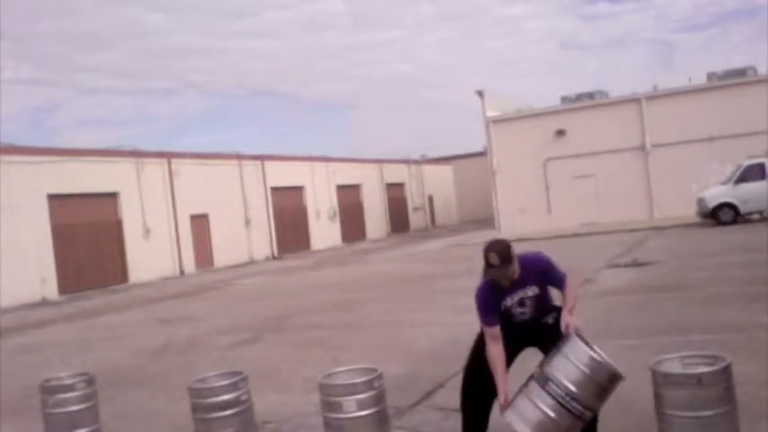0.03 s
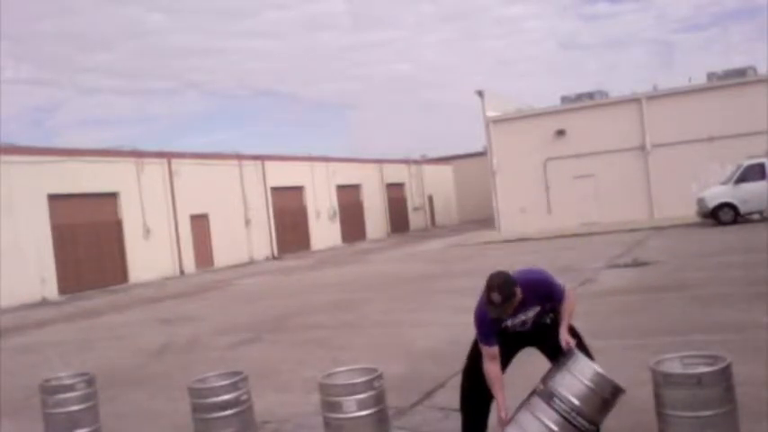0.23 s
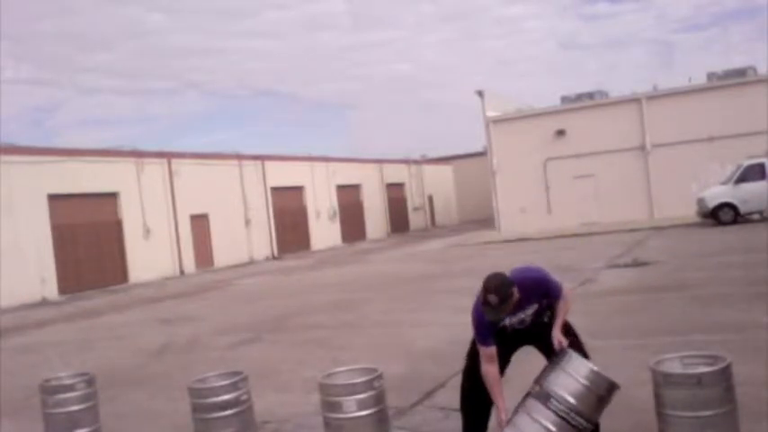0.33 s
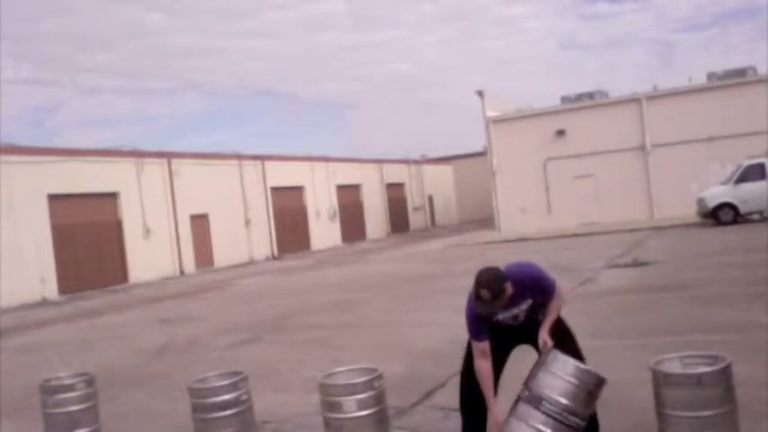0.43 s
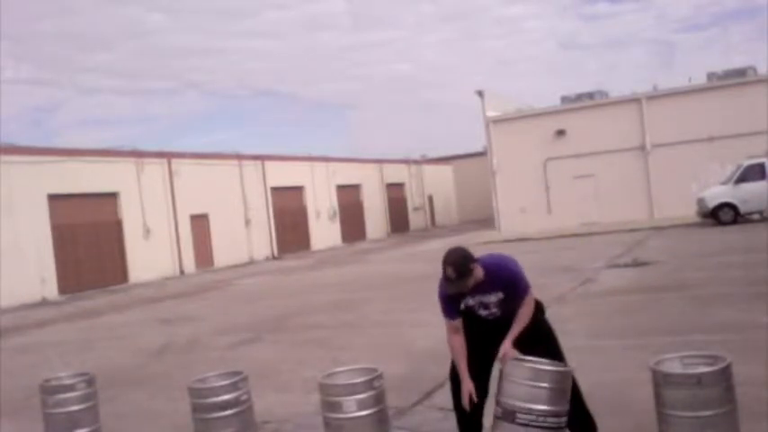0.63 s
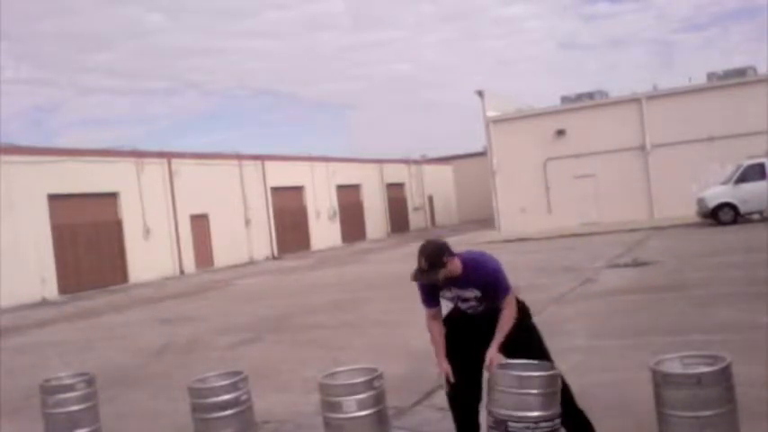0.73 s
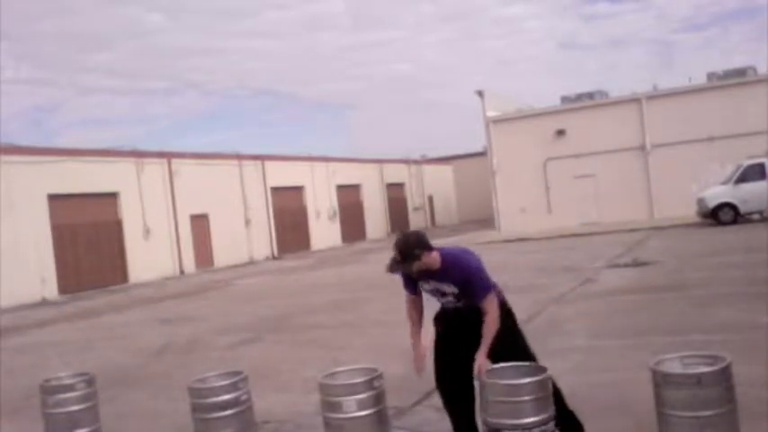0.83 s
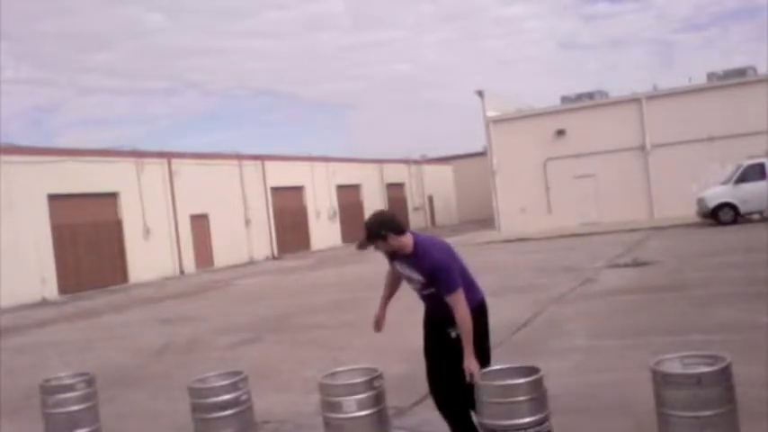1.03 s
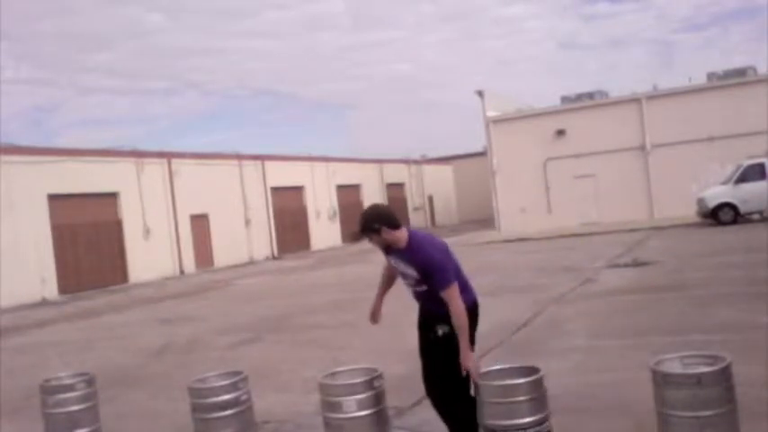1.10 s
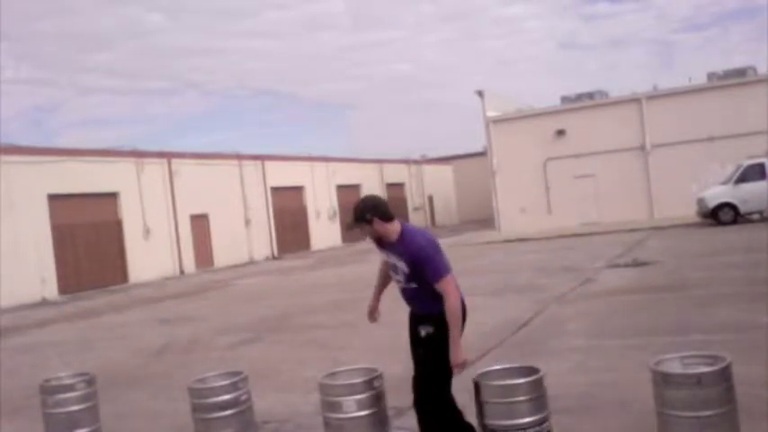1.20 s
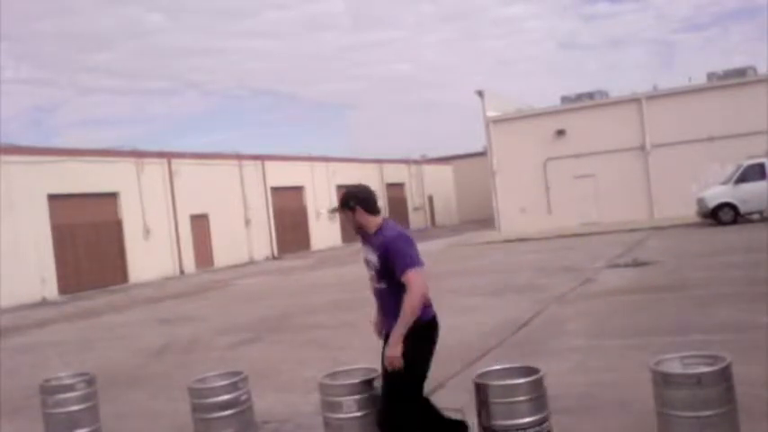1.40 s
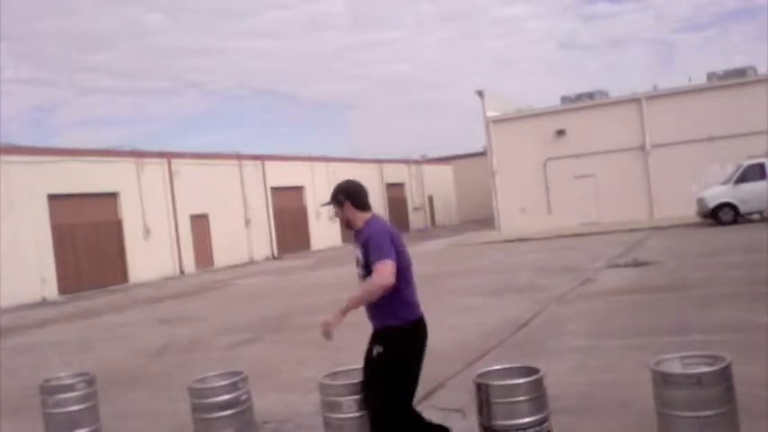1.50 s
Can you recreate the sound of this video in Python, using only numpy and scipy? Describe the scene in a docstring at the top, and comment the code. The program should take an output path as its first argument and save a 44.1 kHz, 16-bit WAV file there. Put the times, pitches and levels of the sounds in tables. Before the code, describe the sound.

A metal keg knocks down on concrete, then clatters and rocks to rest outdoors.

```python
"""A steel beer keg is swung down onto concrete in a yard between low buildings. Its rim lands with one
hard knock that slaps back off the walls, grit crunches as it is tipped upright, then the base clatters down
and rocks to rest. Each impact excites the damped modes of the shell, with a thump from its weight and a
crack at the contact. Faint reverberation and a soft hiss linger over distant traffic and wind."""
import sys
import numpy as np
from scipy import signal
from scipy.fft import rfft, irfft
from scipy.io import wavfile
from scipy.ndimage import uniform_filter1d

SR = 44100
rng = np.random.default_rng(int(sys.argv[2]) if len(sys.argv) > 2 else 0)


def dump_mix(stems):
    """Bounce the given channels to the path in sys.argv[1] as a 16-bit WAV at rate SR."""
    frames = np.atleast_2d(stems).T  # one column per channel
    limited = np.clip(frames, -1, 1)  # hard clip at full scale
    pcm = np.round(limited * 32767).astype(np.int16)
    wavfile.write(sys.argv[1], SR, pcm)


N = 68355
T = np.arange(N) / SR

# Knocks of the keg on the ground, and the first knock's slap echoes off the walls (0.30 to 0.44 s).
# Each row: start in seconds, relative levels in dB of the low thud, middle clang, high ring and crack,
# stance from 0 (tilted) to 1 (upright).
KNOCKS_AND_ECHOES = [(0.2040, -6.5, -5, -17.5, -23.5, 0.19), (0.2078, -12.5, -13, -6, -11.5, 0.23),
                     (0.2120, -13.5, -11, -20.5, -28.5, 0.3), (0.2285, -10, -28, -21, -29, 0.04),
                     (0.243, -60, -31.5, -18, -28.5, 0.095), (0.3000, -19, -27, -22.5, -34, 0),
                     (0.3309, -24, -22, -24.5, -61, 0.17), (0.3550, -35.5, -33, -27, -50, 0),
                     (0.3820, -54, -41, -27.5, -49, 0), (0.4400, -26.5, -35, -41, -80, 0),
                     (0.4680, -32.5, -51, -34.5, -75, 0.75), (0.888, -35, -39.5, -47, -56, 0.88),
                     (0.9422, -14.5, -13.5, -15.5, -35, 1), (0.9460, -74, -24, -13.5, -40, 0.2),
                     (0.9520, -28, -16.5, -15, -44, 1), (0.978, -18, -11, -15.5, -32, 0.7),
                     (0.9990, -16, -14, -21.5, -35, 0.94), (1.0144, -16.5, -9, -31, -44, 0.41),
                     (1.0460, -19, -6, -18.5, -30.5, 0.95), (1.0538, -6, -19, -69, -39, 0.85),
                     (1.0705, -34, -23, -31.5, -40, 0.47), (1.0950, -28, -16.5, -46, -48, 0),
                     (1.1030, -15.5, -30.5, -31, -48, 0.98), (1.1280, -31, -51, -59, -60, 0.69),
                     (1.1415, -30, -23.5, -57, -55, 0.96), (1.185, -35, -58, -47, -54, 0.65),
                     (1.2360, -29, -60, -52, -59, 1)]


def amp(db):
    """Amplitude grows tenfold for every 20 dB."""
    return 10 ** (np.asarray(db) / 20)


def envelope(table, column):
    """Exponential growth and decay: straight lines in dB join the times in a table's first column."""
    rows = np.array(table)
    return amp(np.interp(T, rows[:, 0], rows[:, column]))


def at_hz(hz, points, values):
    """Interpolation of a spectrum on a log-frequency axis."""
    return np.interp(np.log(hz), np.log(points), values)


def convolve(x, response):
    """A linear system convolves its input with its impulse response."""
    return signal.fftconvolve(x, response)[:N]


def colour(x, spectrum, size=4096):
    """A minimum-phase filter through (Hz, dB) points, scaled to keep the power of white noise."""
    hz = np.maximum(np.arange(size // 2 + 1) * SR / size, 1)
    gain = unit(amp(at_hz(hz, *np.array(spectrum).T)))
    cepstrum = irfft(np.log(gain))
    cepstrum[1:size // 2] *= 2  # folding the cepstrum makes the filter causal
    cepstrum[size // 2 + 1:] = 0
    return convolve(x, irfft(np.exp(rfft(cepstrum))))


def high_pass(x, hz, order=4):
    """Below the cutoff the level falls 6 dB per octave for each order."""
    return signal.sosfilt(signal.butter(order, hz, "high", fs=SR, output="sos"), x)


def unit(x):
    """Normalisation to an rms of 1."""
    return x / np.sqrt(np.mean(x ** 2))


def noise():
    """White noise has equal mean power at all frequencies."""
    return rng.standard_normal(N)


def add(out, start, sound):
    """Superposition: a sound joins the mix at its start in seconds."""
    i = int(start * SR)
    out[i:i + len(sound)] += sound[:N - i]


def ringing(hz, t60):
    """Free vibration: each mode is a complex oscillation that falls 60 dB in t60 seconds."""
    return np.exp((2j * np.pi * hz - np.log(1000) / t60)[:, None] * T[:SR // 3])


def distant_rumble(smoothing_samples=5000):
    """Far traffic and wind merge into low noise under slow, slight amplitude modulation."""
    # Rumble spectrum. Each row: frequency in Hz, relative density in dB.
    spectrum = [(25, 3.5), (55, -21.5), (100, -5), (180, 2.5), (300, -3), (600, -6.5), (1300, -10),
                (2000, -20.5), (4000, -32.5), (8000, -49), (15000, -138)]
    swell = unit(uniform_filter1d(uniform_filter1d(noise(), smoothing_samples), smoothing_samples))
    return unit(colour(noise(), spectrum)) * amp(-49 + 0.4 * swell)


def keg_ring(count=260, spread_s=0.0015):
    """Modal superposition: knocks and echoes carry the same modes, in a balance set by the stance."""
    # Main modes. Each row: frequency in Hz, 60 dB decay time in seconds, tilted and upright levels in dB.
    modes = [(128.2, 0.19, -18.5, -29.5), (176.6, 0.096, -8, -15.5), (213.7, .11, -6.5, -13),
             (250.7, 0.073, -3, -13.5), (301.6, 0.091, -12, -7.5), (342.3, 0.2, -21, -7),
             (390, 0.093, -14, -6), (476.6, .2, -28, -13), (650.7, 0.089, -20, -14.5),
             (718, 0.18, -24.5, -10.5), (773.7, 0.17, -30, -11.5), (903, 0.17, -13, -18),
             (1117, 0.13, -28.5, -12), (1185, 0.14, -42.5, -11), (1219, 0.12, -43, -12),
             (1752, 0.1, -9, -8.5), (1872, 0.15, -11, -9), (1974, 0.21, -15, -24.5),
             (2084, 0.27, -22.5, -38.5), (2213, 0.16, -22.5, -47), (2410, .17, -20.5, -16),
             (2596, 0.15, -25, -17), (2790, .12, -19.5, -48)]
    # Envelope of the many weaker modes. Each row: frequency in Hz, tilted and upright levels in dB.
    shell = [(402.4, -33, -10), (770, -20.5, -25.5), (1240, -25, -22.5), (1325, -16.5, -27.5),
             (1980, -17, -40.5), (2320, -29, -22.5), (2780, -24.5, -26.5), (3140, -38, -37.5),
             (4568, -43.5, -33)]
    modes, shell = np.array(modes), np.array(shell)
    lowest, highest = shell[[0, -1], 0]
    shell_hz = lowest + (highest - lowest) * (np.arange(count) + rng.random(count)) / count
    shell_t60 = 0.079 * (shell_hz / 1000) ** -0.17  # higher modes die sooner
    hz = np.r_[modes[:, 0], shell_hz]
    rings = ringing(hz, np.r_[modes[:, 1], shell_t60])
    tilted = np.r_[modes[:, 2], at_hz(shell_hz, shell[:, 0], shell[:, 1])]
    upright = np.r_[modes[:, 3], at_hz(shell_hz, shell[:, 0], shell[:, 2])]
    spread = 1 - np.exp(-T[:rings.shape[1]] / spread_s)  # vibration takes time to spread over the shell
    out = np.zeros(N)
    for start, thud, clang, ring, _, stance in KNOCKS_AND_ECHOES:
        strength_db = at_hz(hz, (260, 900, 2200), [thud, clang, ring])
        gains = amp(strength_db + tilted + stance * (upright - tilted))
        phasors = np.exp(2j * np.pi * rng.random(len(hz)))
        add(out, start, spread * ((gains * phasors) @ rings).imag)
    return out


def thumps(rise_s=0.0026, tilted_hz=228.6, upright_hz=319.3):
    """Heavy damping: the keg's weight gives knocks and echoes a brief thump, higher when upright."""
    out, t = np.zeros(N), T[:SR // 10]
    pulse = t / rise_s * np.exp(1 - t / rise_s)
    for start, thud, *_, stance in KNOCKS_AND_ECHOES:
        hz = np.interp(stance, [0, 1], [tilted_hz, upright_hz])
        add(out, start, amp(thud - 1.5) * pulse * np.sin(2 * np.pi * hz * t))
    return out


def cracks(crush_s=0.0031, tail_s=0.062):
    """Brief contact gives a broad spectrum: a snap, crushing and a bright tail, also heard in echoes."""
    # Steel striking concrete. Each row: frequency in Hz, relative density in dB.
    spectrum = [(60, -31.5), (150, -28.5), (500, -14.5), (2000, -0.5), (4000, 2), (6300, -4.5),
                (9000, -8.5), (13000, -16), (16000, -25)]
    out, t = np.zeros(N), T[:8000]
    fade = np.exp(-t / crush_s) + amp(-24.5) * np.exp(-t / tail_s)
    snap = 2.839 * (t == 0)
    for start, *_, crack_db, _ in KNOCKS_AND_ECHOES:
        burst = rng.standard_normal(len(t)) * fade
        add(out, start, amp(crack_db - 4.5) * (burst + snap))
    return colour(out, spectrum)


def yard_reverb(x, build_s=0.0083, t60_s=1.1):
    """Reverberation: scattered reflections from the walls build up, then decay exponentially."""
    # Colour of the reflections. Each row: frequency in Hz, relative gain in dB.
    spectrum = [(80, 6), (170, -2.5), (280, -2.5), (700, -6.5), (1900, 1), (2600, -4), (4500, -12),
                (8000, -11), (15000, -44)]
    build = 1 - np.exp(-(T / build_s) ** 2)
    tail = noise() * build * np.exp(-np.log(1000) * T / t60_s)
    return amp(-23) * colour(convolve(x, tail / np.linalg.norm(tail)), spectrum)


def grit(attack_s=0.0049, release_s=0.0048, bite_db=18):
    """Friction and fracture: sand grinds under the rolling rim; larger grains burst, clink and crunch."""
    # Grains crushed. Each row: start and length in seconds, crunch and fizz levels in dB.
    crunches = [(0.291, 0.0055, -60, -50), (0.354, 0.018, -41.5, -52.5), (0.479, 0.0062, -35.5, -48),
                (0.501, 0.011, -58, -64), (0.657, 0.0062, -39, -43.5), (0.804, 0.0039, -35, -43.5),
                (0.842, 0.0093, -40, -59.5), (0.907, 0.0071, -31.5, -40.5), (0.915, 0.033, -47.5, -84),
                (0.94, 0.014, -28.5, -37), (0.984, 0.011, -39, -41), (0.995, 0.015, -45, -40.5)]
    # The rim grinding along the ground. Each row: time in seconds, crunch and fizz levels in dB.
    grind = [(0.60, -120, -120), (0.69, -68, -62.5), (0.80, -56, -59), (0.90, -57.5, -54.5),
             (0.96, -34, -45.5), (1.06, -34.5, -42.5), (1.14, -44, -53), (1.20, -72, -73),
             (1.55, -85, -110)]
    # The grit's midrange rasp. Each row: frequency in Hz, relative density in dB.
    rasp_spectrum = [(300, -7), (1300, 5), (1900, -13.5), (2700, 8.5), (3600, -1.5), (4600, -33.5),
                     (6000, -13), (9000, -16)]
    # Its treble fizz. Each row: frequency in Hz, relative density in dB.
    fizz_spectrum = [(3000, -1), (5500, -14.5), (7300, -6), (8600, 5.5), (10500, 1), (13000, -5.5),
                     (16000, -56)]
    crunch, fizz = envelope(grind, column=1), envelope(grind, column=2)
    first_grains = np.zeros(N)
    for start, length, crunch_db, fizz_db in crunches:
        age = T - start
        shape = np.clip(age / attack_s, 0, 1) * np.exp(-np.maximum(age - length, 0) / release_s)
        crunch += amp(crunch_db) * shape
        fizz += amp(fizz_db) * shape
        add(first_grains, start, amp([crunch_db + bite_db]))
    bites = grains() * crunch
    clinks = rim_clink(amp(-4) * bites + first_grains)
    rasp = amp(-5) * colour(bites, rasp_spectrum)
    return clinks + rasp + colour(grains() * fizz, fizz_spectrum)


def grains(per_second=4400):
    """Shot noise: independent clicks of uneven size."""
    return unit(noise() * (rng.random(N) < per_second / SR))


def rim_clink(force):
    """Resonance: the bite of the grit drives short-lived modes of the steel rim."""
    # Rim modes. Each row: frequency in Hz, 60 dB decay time in seconds, relative level in dB.
    modes = [(1180, 0.014, -16), (1740, 0.039, -2), (2248, 0.017, 7.5), (2524, 0.0272, 9.5),
             (2754, 0.052, 1), (3120, 0.05, -14.5), (3463, 0.042, -12), (3870, 0.1, -11), (4170, 0.06, -9),
             (5080, 0.039, -8.5)]
    hz, t60, db = np.array(modes).T
    response = amp(db) @ ringing(hz, t60).imag
    return convolve(force, response / np.linalg.norm(response))


def hiss():
    """Filtered noise swells as the base comes down and lingers once the keg stands."""
    # Course of the hiss. Each row: time in seconds, level in dB.
    levels = [(0.6, -110), (0.9, -63), (1.05, -50), (1.2, -52), (1.33, -54), (1.43, -59), (1.55, -63)]
    # Its spectrum. Each row: frequency in Hz, relative density in dB.
    spectrum = [(800, 6.5), (2000, 8), (3000, 7), (5000, 7), (6500, -3), (8500, -15), (14000, -46)]
    return colour(noise(), spectrum) * envelope(levels, column=1)


def scene():
    """Sound pressures add: the keg, the grit, their reverberation and the outdoor background."""
    keg = keg_ring() + thumps() + cracks()
    foreground = high_pass(keg, hz=144, order=2) + grit()  # the keg is too small to radiate deep bass
    return (foreground + yard_reverb(foreground) + hiss() + distant_rumble())[None]


def record(dry, top_hz=16000):
    """Band limiting and saturation: the microphone drops deep bass, rounds peaks and cuts the top."""
    thin = high_pass(dry, hz=86)
    rounded = thin / (1 + thin ** 4) ** .25
    return signal.sosfilt(signal.ellip(8, .2, 70, top_hz, fs=SR, output="sos"), rounded)


dry = scene()
out = record(dry)
dump_mix(out)
```